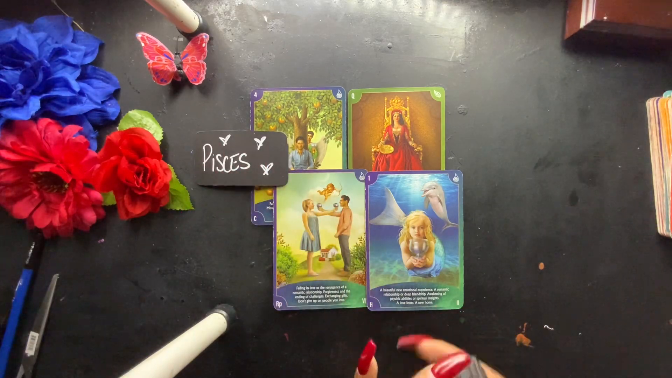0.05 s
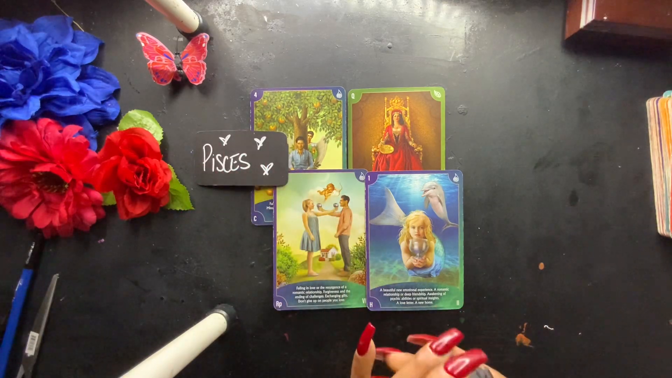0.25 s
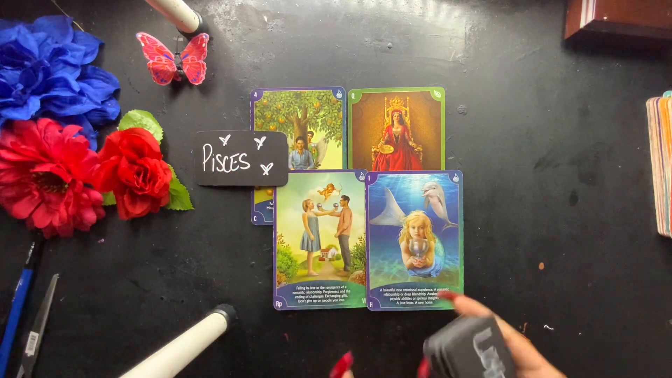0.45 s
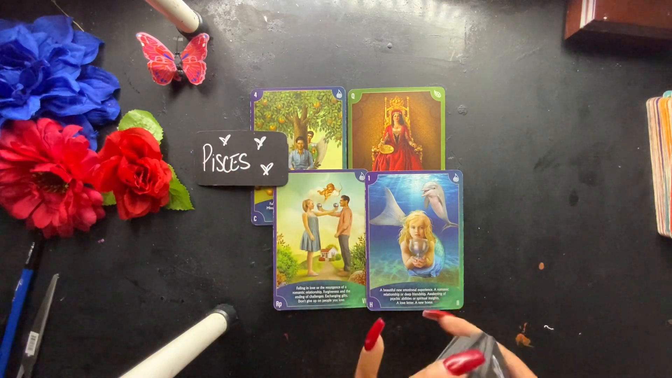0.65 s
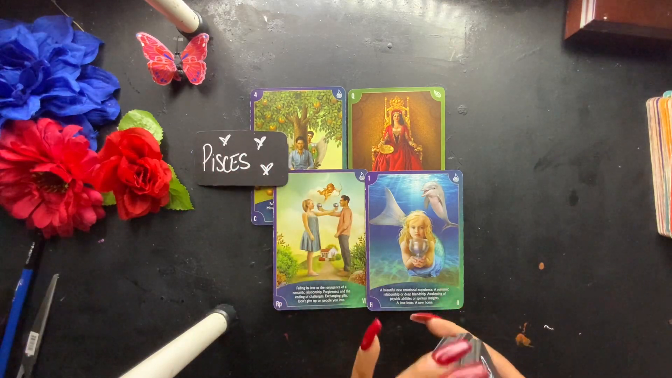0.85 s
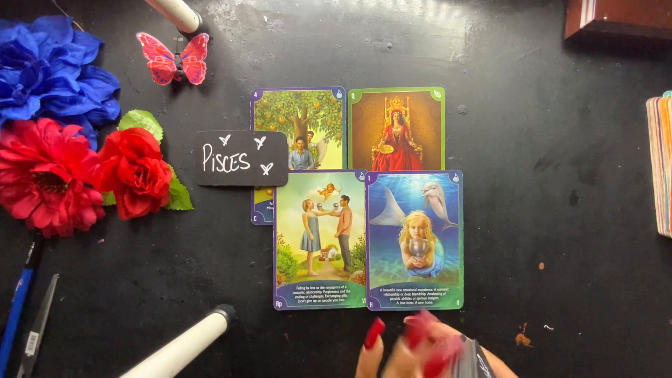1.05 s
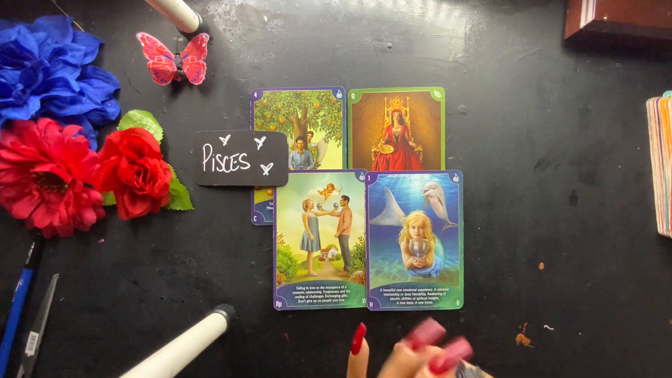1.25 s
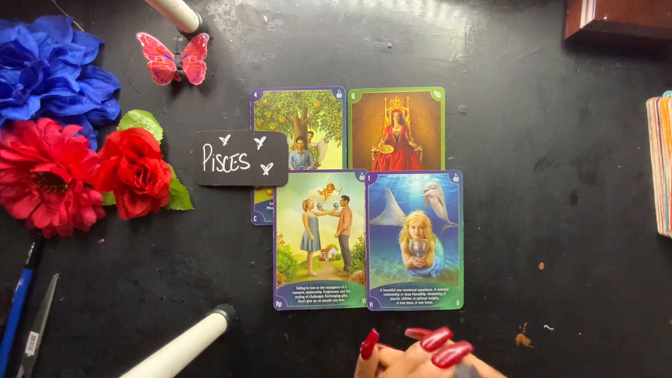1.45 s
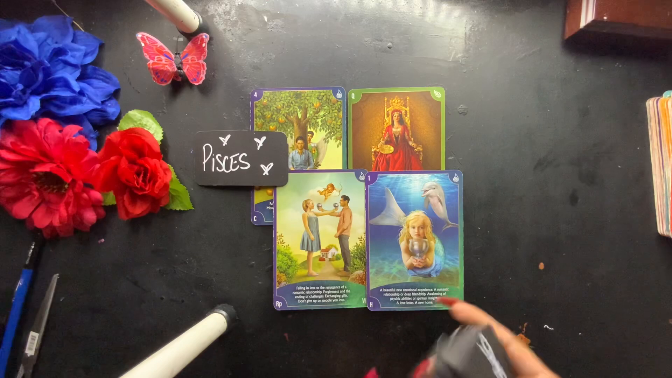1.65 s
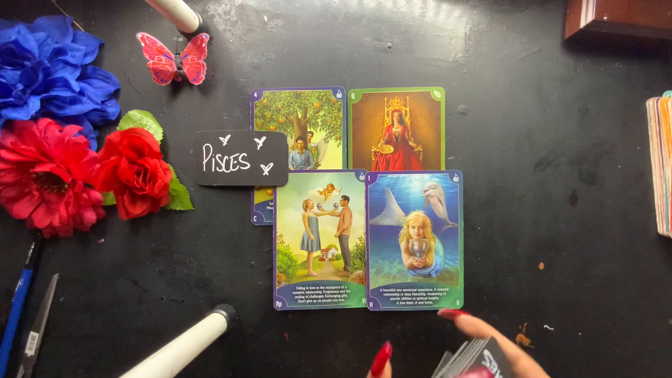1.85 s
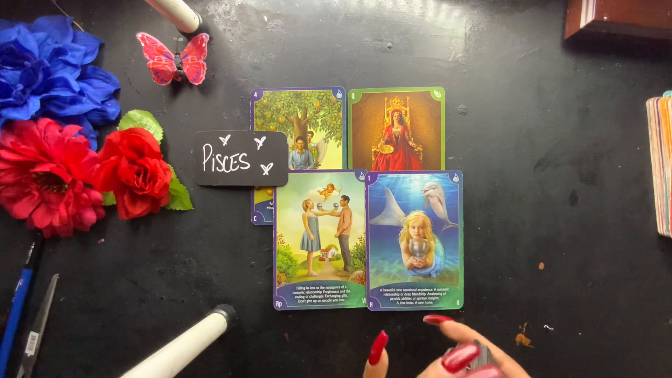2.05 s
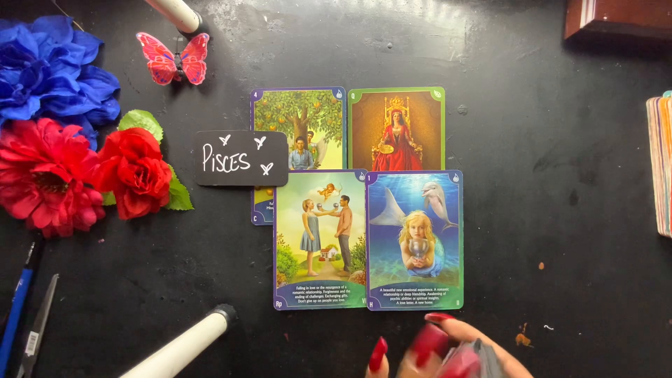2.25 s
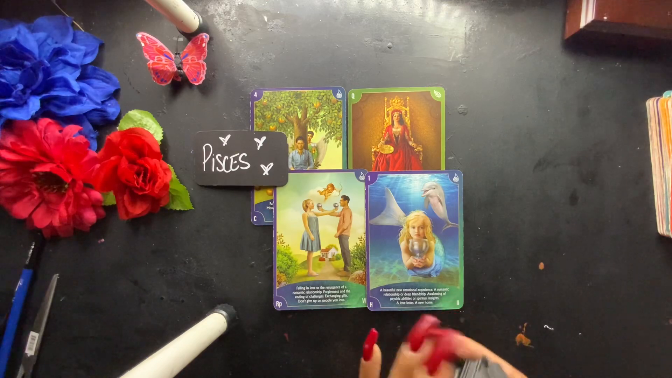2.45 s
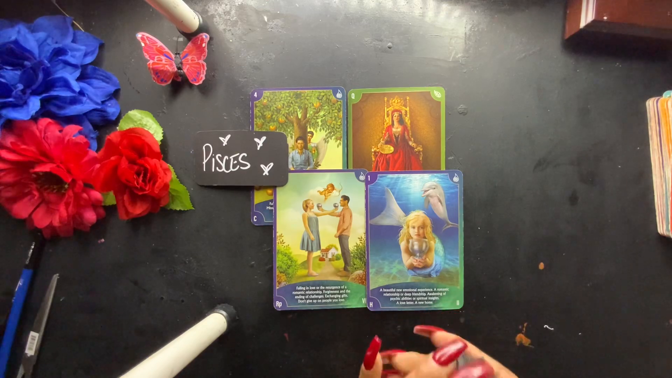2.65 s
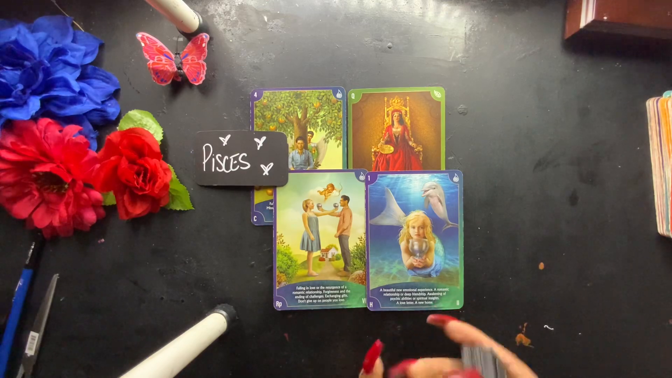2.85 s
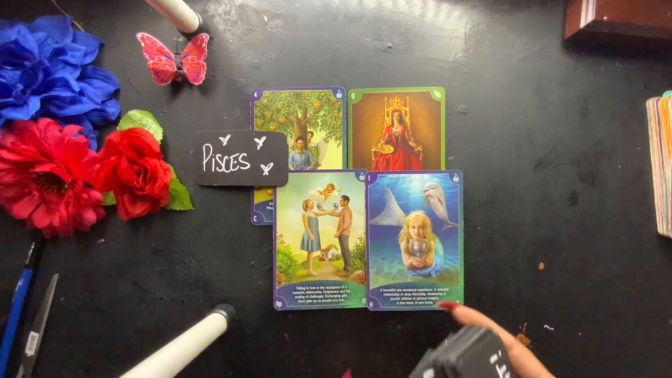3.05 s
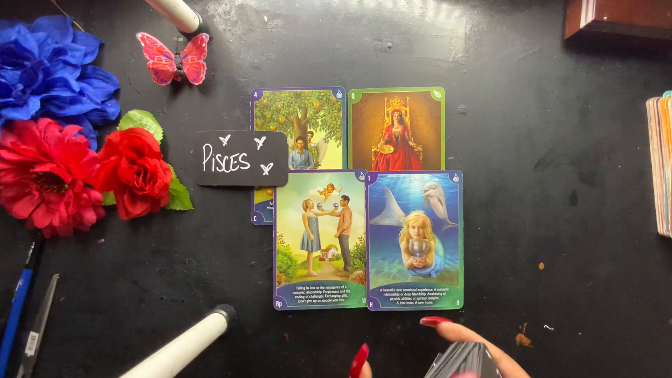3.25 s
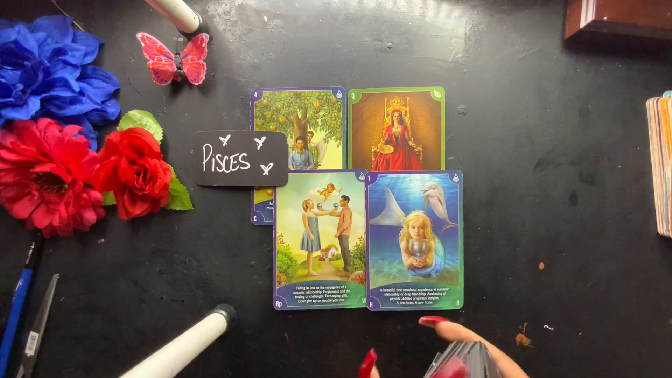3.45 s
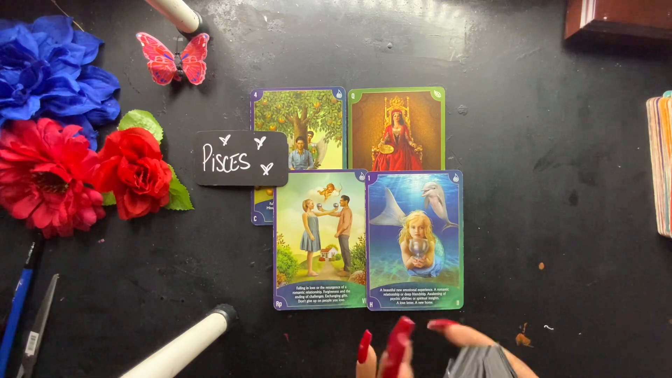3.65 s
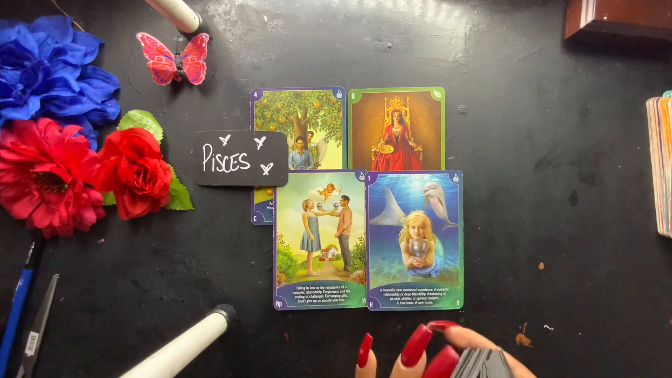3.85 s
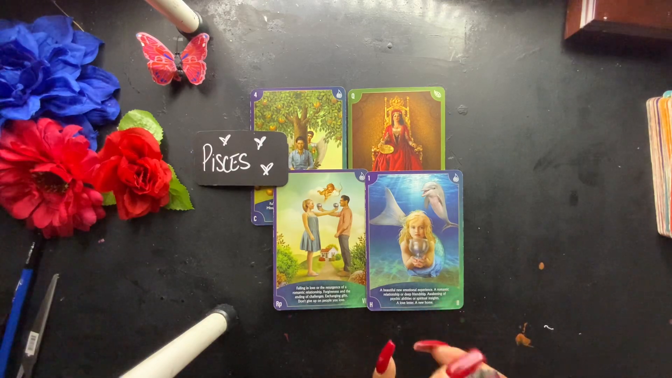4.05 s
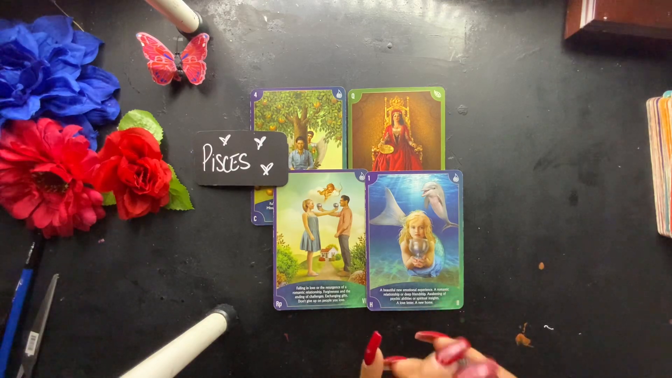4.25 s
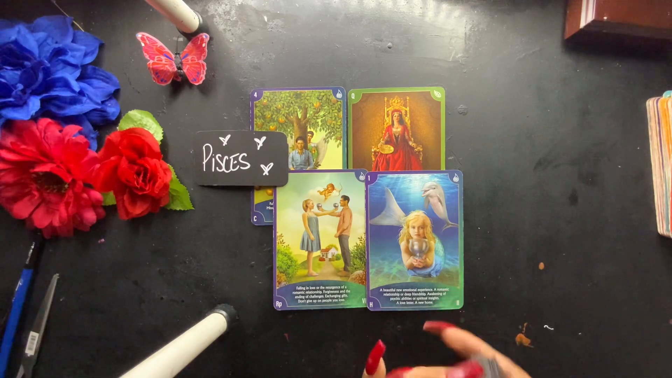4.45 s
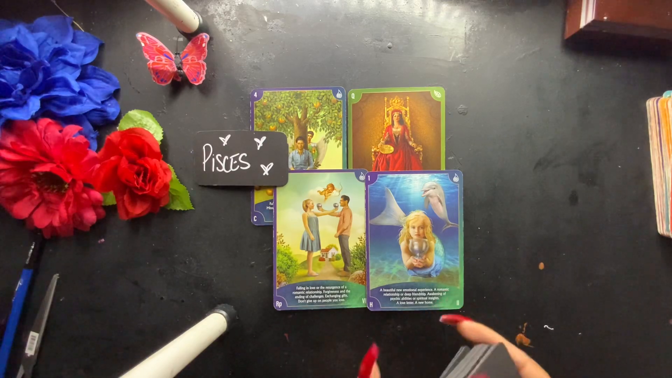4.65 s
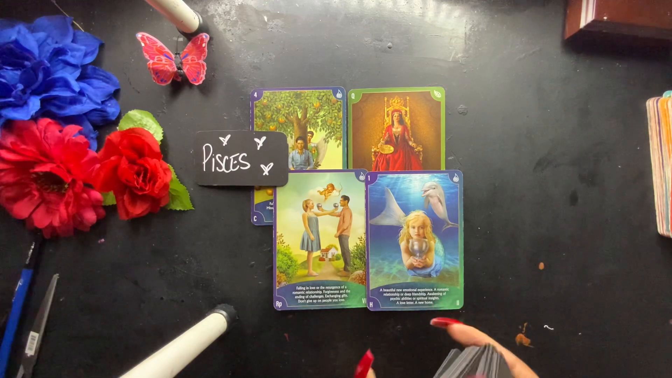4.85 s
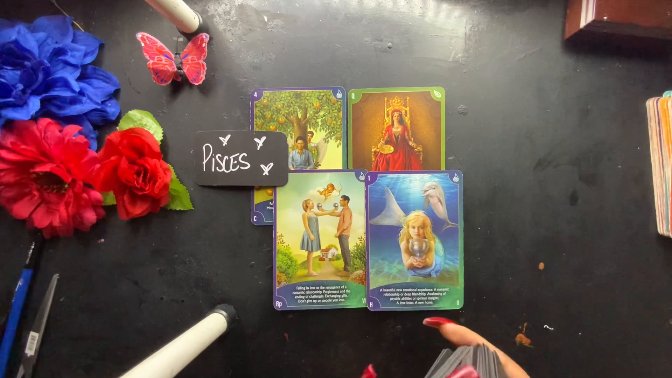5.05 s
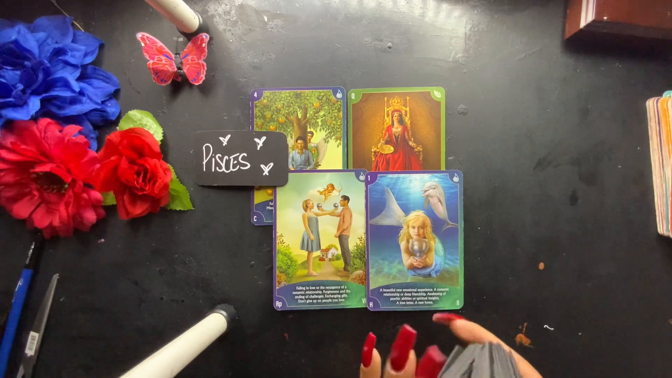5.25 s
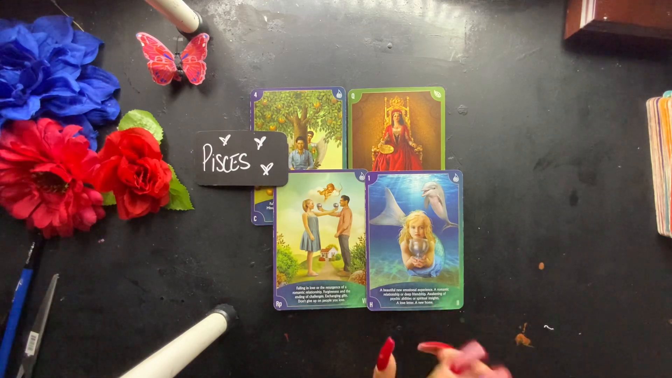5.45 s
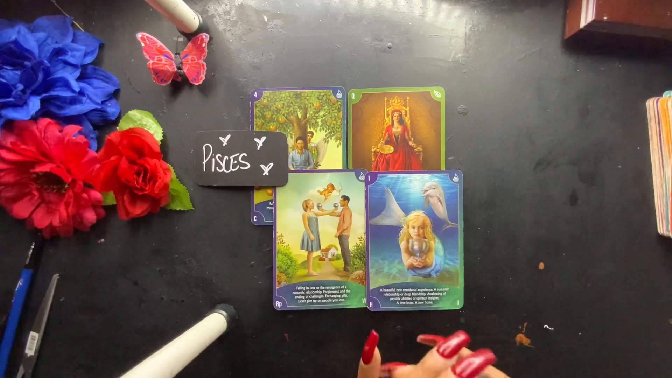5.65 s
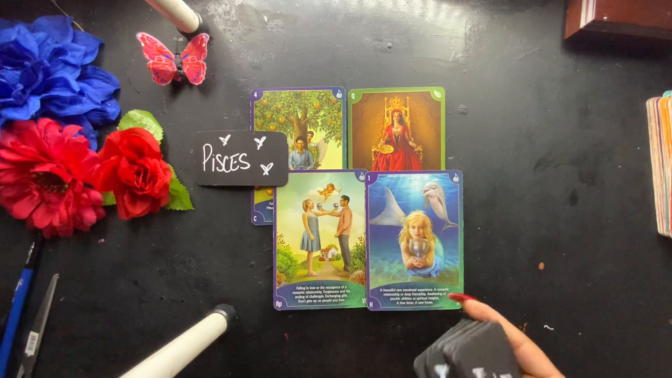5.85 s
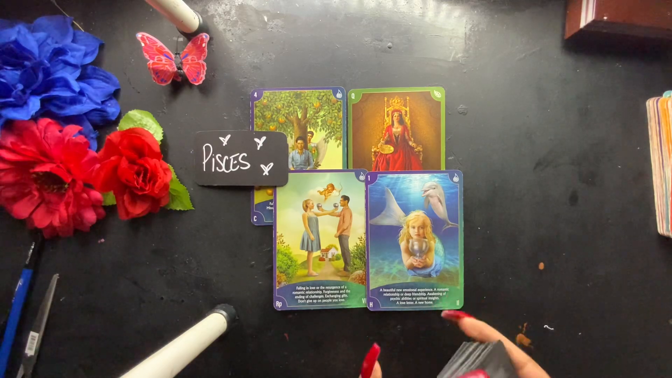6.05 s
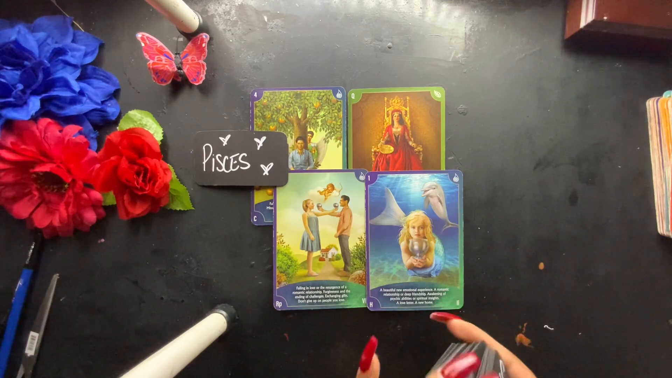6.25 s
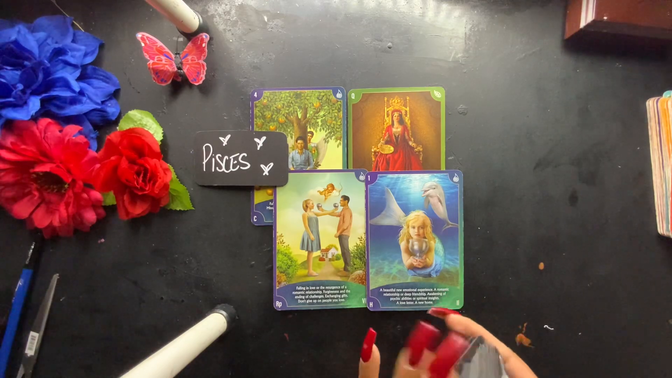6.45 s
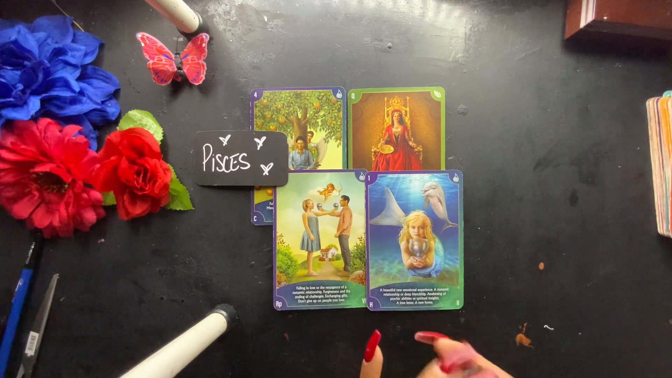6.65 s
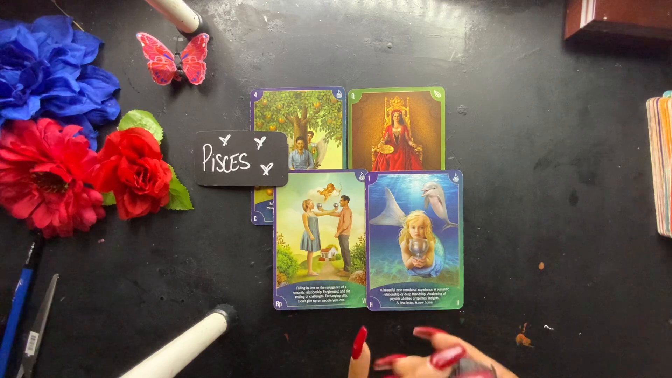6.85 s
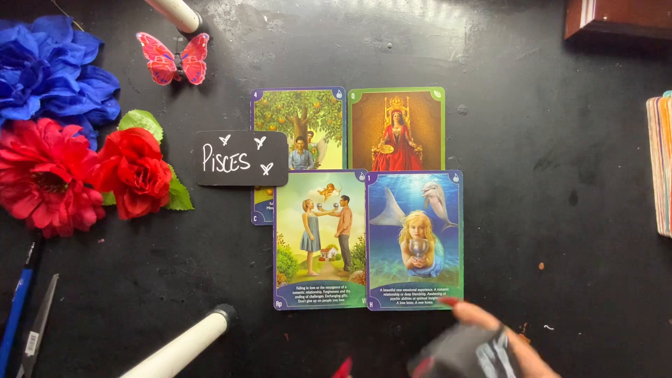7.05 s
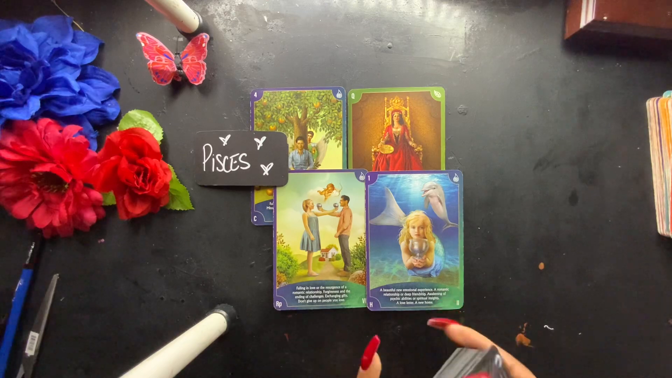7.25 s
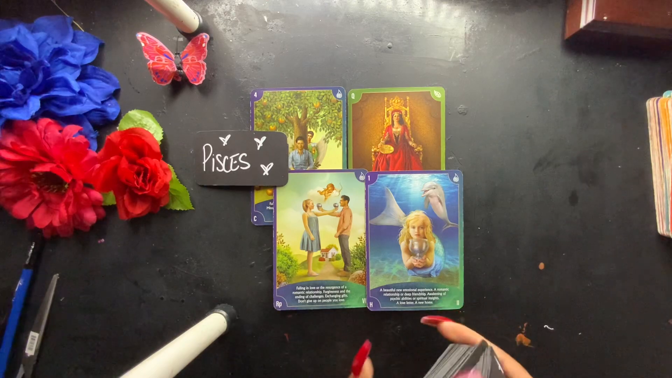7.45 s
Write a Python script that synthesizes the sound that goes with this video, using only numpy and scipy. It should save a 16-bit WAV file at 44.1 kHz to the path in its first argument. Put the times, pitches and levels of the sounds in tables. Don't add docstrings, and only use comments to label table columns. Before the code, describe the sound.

Dry papery rustling and quick card pulls lead to irregular slaps, each hard one a bright crack with a short edge ring and puff of air, followed by a softer tap and skid. Gentle taps fill the gaps. Faint low house hum underneath; small room, short desk and wall reflections, close phone microphone, pops leaning right and the treble arriving there slightly late.

```python
import sys
import numpy as np
from scipy import signal
from scipy.fft import rfft, irfft, next_fast_len
from scipy.io import wavfile
from scipy.ndimage import uniform_filter1d, map_coordinates

SR = 44100
rng = np.random.default_rng(int(sys.argv[2]) if len(sys.argv) > 2 else 0)


def transcribe(u):
    v = np.clip(np.atleast_2d(u).T, -1, 1)
    q = np.round(v * 32767).astype(np.int16)
    wavfile.write(sys.argv[1], SR, q)


def invert_db(level):
    return 10 ** (np.asarray(level, dtype=float) / 20)


N = 331014
SIZE = next_fast_len(N, True)
T = np.arange(N) / SR
HZ = np.maximum(np.fft.rfftfreq(SIZE, 1 / SR), 1)

# (frequency [Hz], level [dB per Hz])
HOUSE_MODES = [(25, -25), (40, -7), (54, 2.5), (72, 0.5), (84, -17.5), (98, 1), (122, -12.5), (145, 1),
               (175, -17), (257, -6), (330, -16.5), (450, -22), (700, -30.5), (1500, -38.5)]
# (start [s], length [s], first level [dB], last level [dB])
SLIDES = [(.0, 0.23, -58.5, -71.5), (.26, .08, -72, -77.5), (.68, 0.028, -59.5, -65),
          (.74, 0.045, -65.5, -58.5), (.88, 0.055, -58.5, -59.5), (.96, 0.055, -68, -60.5),
          (1.245, 0.13, -61.5, -58.5), (1.52, 0.092, -73, -71.5), (1.995, 0.15, -56.5, -51.5),
          (2.18, 0.037, -65.5, -68), (2.4, 0.056, -78.5, -73.5), (2.495, 0.23, -58.5, -63),
          (2.79, 0.052, -64.5, -64), (3.272, 0.091, -51, -54), (3.38, 0.063, -58.5, -55.5),
          (3.47, 0.044, -63.5, -56), (3.55, 0.059, -67, -69.5), (3.78, 0.053, -59.5, -57.5),
          (3.925, 0.1, -57, -57.5), (4.05, 0.083, -60, -60), (4.2, 0.067, -65, -56.5),
          (4.33, 0.074, -71, -97.5), (4.875, 0.12, -54, -55), (5.37, 0.043, -57.5, -57),
          (5.44, 0.12, -56, -65), (5.57, 0.077, -64, -56.5), (6.39, 0.07, -65.5, -58.5),
          (6.62, 0.17, -61.5, -58.5), (6.93, 0.14, -65.5, -51.5), (7.44, 0.057, -55, -51)]
# (end [s], level [dB], rise [s],
# stop [s])
SWISHES = [(0.024, -49.5, 0.0075, 0.0036), (0.211, -50, 0.017, 0.011), (.39, -37, 0.016, .008),
           (1.04, -40, 0.011, 0.016), (1.213, -64.5, 0.0087, 0.0072), (1.432, -51.5, 0.018, 0.018),
           (1.629, -47, .002, .008), (1.655, -35.5, 0.019, 0.0036), (2.283, -44.5, 0.0067, 0.0056),
           (2.771, -58, 0.0039, 0.0069), (2.888, -41, 0.011, 0.023), (2.904, -36.5, 0.013, 0.0067),
           (3.699, -46, 0.023, .006), (4.161, -52, .025, 0.029), (4.503, -36, 0.033, 0.0068),
           (4.84, -58.5, 0.0067, 0.036), (5.112, -47.5, 0.047, 0.022), (5.7, -60, 0.0063, 0.034),
           (5.841, -32, 0.02, 0.0049), (6.215, -55, 0.024, 0.009), (6.467, -47.5, 0.013, 0.0088),
           (6.86, -52, 0.021, 0.028), (7.041, -39.5, 0.014, 0.0064), (7.051, -33.5, 0.0066, 0.0042),
           (7.401, -60, 0.016, 0.029)]
# (start [s], length [s], first level [dB], last level [dB], middle share [dB])
SKIDS = [(0.418, 0.058, -65, -69.5, -6), (0.598, 0.046, -38.5, -48.5, -3), (0.799, 0.053, -49.5, -58.5, -5),
         (1.681, 0.18, -57.5, -87.5, 3), (1.843, .1, -39.5, -58, -6), (2.248, 0.014, -57, -69, -4),
         (2.303, 0.063, -63, -86, -9), (2.945, 0.2, -66, -76, 4.5), (3.089, 0.083, -42.5, -52.5, -5.5),
         (3.199, 0.06, -65.5, -69, -7), (3.704, 0.053, -49, -55.5, -8.5), (4.519, 0.16, -57, -84, 0),
         (3.859, 0.047, -74, -72, 0), (4.677, .13, -37.5, -57, -6), (5.111, 0.039, -47, -56.5, -7),
         (5.872, 0.15, -58.5, -82, 3), (6.022, 0.063, -38.5, -54.5, -3), (6.099, .05, -62, -68, -6.5),
         (6.23, .1, -51.5, -59, -5), (6.472, 0.095, -64.5, -76.5, -11), (7.086, 0.21, -60, -72.5, 3),
         (7.249, 0.13, -39, -65.5, -5.5)]
# (time [s], crack [dB], edge [dB], thud [dB])
SLAPS = [(0.4254, -39.5, -48.5, -47), (0.597, -49, -38, -43.5), (0.7963, -38, -36.5, -46),
         (1.6782, -13, -26.5, -40.5), (1.8476, -57, -38, -45.5), (2.0494, -42, -41, -48),
         (2.2473, -44.5, -55.5, -53), (2.9358, -15, -22.5, -44), (3.0876, -56, -56, -66),
         (3.1032, -38, -35, -46), (3.3, -44, -49.5, -66), (3.5045, -54, -48, -69),
         (3.5138, -53, -44.5, -60), (3.6171, -52, -46.5, -60), (3.821, -43, -52, -73),
         (3.862, -54, -62, -59), (3.9315, -60, -51.5, -71), (4.5257, -18.5, -26.5, -38.5),
         (4.6775, -29, -36.5, -53), (4.8808, -50, -46.5, -50.5), (4.91, -64, -48, -63),
         (5.1046, -53, -40, -44), (5.8631, -18, -28, -47.5), (6.0253, -34, -35, -50),
         (6.2208, -46, -40.5, -58), (6.2719, -54, -58, -66), (7.0754, -17.5, -28, -41),
         (7.2194, -38.5, -39, -65), (7.2511, -49, -37, -45), (7.458, -41, -39, -45.5)]
# (time [s], peak [dB], pitch [Hz], deck knock [dB])
POPS = [(0.4264, -45, 1550, -63), (0.5968, -39.5, 1673, -67), (0.794, -46, 1620, -52),
        (0.842, -51, 1540, -64), (1.6793, -19.5, 1470, -43), (1.8478, -25, 1560, -50.5),
        (2.054, -38.5, 1475, -59), (2.9053, -34, 1540, -55), (2.911, -35.5, 1540, -46),
        (2.9352, -23, 1247, -30), (3.1049, -40.5, 1480, -56), (3.36, -59, 1560, -84),
        (3.517, -46.5, 1870, -51.5), (3.614, -50, 1460, -67), (3.821, -56, 1390, -64),
        (3.869, -59, 1520, -67), (4.4953, -37.5, 1570, -56), (4.5037, -32, 1420, -49),
        (4.527, -19.5, 1380, -44), (4.684, -42, 1590, -46), (4.8777, -42.5, 1485, -51.5),
        (5.1082, -38, 1520, -55), (5.8618, -15, 1440, -38.5), (6.0271, -18.5, 1520, -55),
        (6.22, -34.5, 1530, -63), (6.2723, -48.5, 1390, -59), (7.075, -21, 1485, -38.5),
        (7.218, -46, 1640, -50.5), (7.2463, -35.5, 1450, -52), (7.454, -37.5, 1510, -46)]
# (time [s], peak [dB], pitch [Hz])
RINGS = [(0.596, -42, 2570), (0.7951, -33.5, 2490), (0.796, -36, 5900), (1.6786, -25.5, 2594),
         (1.8477, -41.5, 3030), (2.2461, -52, 3090), (2.935, -22, 4530), (2.942, -25, 3160),
         (3.101, -42, 2910), (3.5157, -44, 2570), (3.8225, -51, 2430), (3.863, -55, 2550),
         (3.9347, -46, 2500), (4.5245, -23, 4080), (4.525, -20.5, 4500), (4.5255, -27.5, 5670),
         (4.6768, -32.5, 2790), (5.8617, -28, 4360), (6.0274, -32.5, 3070), (6.2203, -40, 2940),
         (7.075, -26.5, 4380), (7.218, -44, 3080), (7.2479, -39, 2530)]
# (frequency [Hz], gain [dB])
PAPER_COLOUR = [(4600, -0.5), (6000, 3), (7500, 1), (10000, 2.5), (12000, 3), (14000, -3.5), (16000, 0.5)]
# (frequency [Hz], gain [dB])
FRICTION_LEFT = [(300, -9), (500, -5.5), (800, -9), (1100, -22.5), (1600, -12.5), (2200, -7.5), (2900, -8),
                 (3500, 1.5), (4500, -7)]
# (frequency [Hz], gain [dB])
FRICTION_RIGHT = [(300, -9.5), (500, -7), (800, -12), (1100, -4), (1500, 9.5), (2000, -3.5), (2600, 4),
                  (3200, 5), (3800, -2), (4500, -2.5)]
# (frequency [Hz], gain [dB])
BODY_LEFT = [(250, -7.5), (500, -10), (900, -11), (1500, -5), (2400, -2.5), (3300, -4.5), (4500, 1)]
# (frequency [Hz], gain [dB])
BODY_RIGHT = [(250, -16), (500, -14), (900, -4), (1500, 8), (2600, 1), (3300, 4), (4500, -2)]
# (frequency [Hz], phase [rad])
RIGHT_TURN = [(4000, 4.3), (4950, 4.45), (6400, 3.95), (7900, 3.9), (9400, 3.77), (11000, 3.97),
              (12600, 4.1), (14200, 4.5)]

HOUSE_DB, HISS_DB = -63.5, -87
BASS_HZ, SHARED_HZ, TREBLE_HZ = 330, 3700, 4700
GRIP_DB_PER_S, LET_GO_DB_PER_S = 1206.5, 709
LAND_DB_PER_S, SETTLE_DB_PER_S = 5001, 600
SLIDE_MIDDLE_DB = -7
SWISH_MIDDLE_DB, SWISH_BRIGHTENS_DB_PER_DB = -8.5, 0.23
POP_RISE_S, POP_FADE_S, HARD_POP_FADE_S, RING_FADE_S = 0.00086, 0.0022, 0.0014, 0.0018
HARD_POP_DB = -29
ROOM_T60_S, ROOM_DB, DESK_ECHO_S, DESK_ECHO_DB = 0.23, -10, 0.0115, -14.5
RIGHT_LAG_S = 0.000648


def unit(x):
    return x / np.sqrt(np.mean(x ** 2))


def noise():
    return rng.standard_normal(N)


def shape(x, gain):
    return irfft(rfft(x, SIZE) * gain, SIZE)[..., :N]


def colour(points):
    hz, db = np.transpose(points)
    return invert_db(np.interp(np.log(HZ), np.log(hz), db))


def step(hz, order=8):
    return 1 / np.sqrt(1 + (hz / HZ) ** (2 * order))


def bumps(times_s, db, rise_s, fall_s):
    out = np.zeros(N)
    for s, d, up, down in np.broadcast(times_s, db, rise_s + 1e-4, fall_s + 1e-4):
        near = slice(max(int((s - 8 * up) * SR), 0), int((s + 10 * down) * SR))
        t = T[near] - s
        out[near] += invert_db(d) * np.exp(np.where(t < 0, t / up, -t / down))
    return out


def house():
    modes = colour(HOUSE_MODES) * (1 - step(1700, order=2))
    mid, side = shape(rng.standard_normal((2, N)), modes)
    side = shape(side, step(420, order=2))
    return invert_db(HOUSE_DB) * (mid + np.array([[1], [-1]]) * side) / mid.std()


def grain(patchy_db, size):
    held = np.repeat(rng.standard_normal(N // size + 1), size)[:N]
    slips = unit(uniform_filter1d(held, size))
    return unit(noise() * invert_db(patchy_db * slips))


def scrape(patchy_db, colour_db):
    _, _, cells = signal.stft(grain(patchy_db, size=200), nperseg=256)
    patches = rng.standard_normal((26, 200))
    rows = np.linspace(0, 25, cells.shape[0])
    columns = np.linspace(0, 199, cells.shape[1])
    where = np.meshgrid(rows, columns, indexing="ij")
    wander_db = colour_db * map_coordinates(patches, where, order=1)
    return unit(signal.istft(cells * invert_db(wander_db), nperseg=256)[1][:N])


def strokes(table, grip_db_per_s, let_go_db_per_s):
    out = np.zeros(N)
    for s, length, first_db, last_db in table:
        end = s + length
        near = slice(max(int((s - 0.1) * SR), 0), int((end + 0.15) * SR))
        t = T[near]
        db = np.interp(t, [s, end], [first_db, last_db])
        db = db - grip_db_per_s * np.maximum(s - t, 0)
        out[near] += invert_db(db - let_go_db_per_s * np.maximum(t - end, 0))
    return out


def friction():
    slide = strokes(SLIDES, GRIP_DB_PER_S, LET_GO_DB_PER_S)
    end, db, rise, stop = np.transpose(SWISHES)
    swish = bumps(end, db, rise, stop)
    share_db = SWISH_MIDDLE_DB - SWISH_BRIGHTENS_DB_PER_DB * (db + 54.5)
    dull_swish = bumps(end, db + share_db, rise, stop)
    skid = strokes([row[:4] for row in SKIDS], LAND_DB_PER_S, SETTLE_DB_PER_S)
    dull_rows = [(s, n, a + share, b + share) for s, n, a, b, share in SKIDS]
    dull_skid = strokes(dull_rows, LAND_DB_PER_S, SETTLE_DB_PER_S)
    return slide + skid + swish, invert_db(SLIDE_MIDDLE_DB) * slide + dull_skid + dull_swish


def walls(x, t60_s=ROOM_T60_S):
    t = T[:int(0.5 * SR)]
    tail = rng.standard_normal(len(t)) * np.exp(-np.log(1000) * t / t60_s) * (t > 0.006)
    tail = invert_db(ROOM_DB) * tail / np.sqrt(np.sum(tail ** 2))
    tail[int(DESK_ECHO_S * SR)] += invert_db(DESK_ECHO_DB)
    return signal.fftconvolve(x, tail)[:N]


def paper_treble(high, rub):
    s, crack_db, _, _ = np.transpose(SLAPS)
    crack = bumps(s, crack_db - 5.5, 0.00051, 0.0029) * grain(0.64, size=20)
    hiss = invert_db(HISS_DB) * noise()
    paper = colour(PAPER_COLOUR) * step(TREBLE_HZ, order=30)
    treble = shape(high * rub + crack + hiss, 0.96 * paper)
    return treble + invert_db(-12) * walls(treble, t60_s=0.2)


def edge():
    s, _, edge_db, _ = np.transpose(SLAPS)
    return bumps(s, edge_db + 5, 0.00017, 0.0052)


def thud():
    s, _, _, thud_db = np.transpose(SLAPS)
    boom = bumps(s + 0.0045, thud_db + 15.5, 0.0011, 0.027) * noise()
    return shape(boom, step(220, order=2) * (1 - step(420, order=3)))


def tones(table, soft_fade_s, hard_fade_s):
    out = np.zeros(N)
    t = np.arange(-400, 1200) / SR
    for s, db, hz, *_ in table:
        fade = hard_fade_s if db > HARD_POP_DB else soft_fade_s
        bell = np.exp(-0.5 * (t / np.where(t < 0, POP_RISE_S, fade + 1e-4)) ** 2)
        start = int((s + 0.001962) * SR)
        out[start - 400:start + 1200] += invert_db(db) * bell * np.sin(2 * np.pi * hz * t)
    return out


def knock():
    s, _, _, knock_db = np.transpose(POPS)
    return bumps(s, knock_db + 20.87, 0.00063, 0.0077)


def right_delay():
    turn_rad = np.interp(HZ, *np.transpose(RIGHT_TURN))
    return np.exp(1j * (turn_rad - 2 * np.pi * HZ * RIGHT_LAG_S))


def scene():
    high, middle = friction()
    rub = scrape(2.2, 2.6)
    treble = paper_treble(high, rub)
    delay = right_delay()
    edges, knocks = edge(), knock()
    pop = tones(POPS, POP_FADE_S, HARD_POP_FADE_S)
    ringing = tones(RINGS, RING_FADE_S, RING_FADE_S)
    band = step(BASS_HZ, order=2) * (1 - step(TREBLE_HZ, order=30))
    knock_band = step(930, order=2) * (1 - step(1300, order=3))
    sides = []
    # (friction colour, body colour, pop [dB], pop into room [dB], knock [dB], lag)
    for points, body, pop_db, wet_db, knock_db, lag in (
            (FRICTION_LEFT, BODY_LEFT, -26, -10, -5, 1),
            (FRICTION_RIGHT, BODY_RIGHT, 5, -2.5, 3, delay)):
        fibres = shape(scrape(2.7, 3.3), 1 - step(SHARED_HZ)) + shape(rub, lag * step(SHARED_HZ))
        cards = shape(2.6 * (middle + invert_db(HISS_DB - 6.5)) * fibres, colour(points) * band)
        cards = cards + shape(edges * noise(), colour(body) * band)
        cards = cards + invert_db(knock_db) * shape(knocks * noise(), knock_band)
        ring = invert_db(knock_db - 6) * ringing
        wash = walls(cards + invert_db(-6) * ring + invert_db(wet_db) * pop)
        wash = shape(wash, 1 - 0.28 * step(3100, order=4))
        sides.append(cards + ring + wash + invert_db(pop_db) * pop)
    return np.array(sides) + np.array([treble, shape(treble, delay)]) + thud() + house()


def roll_off(x):
    return signal.sosfilt(signal.butter(12, 16940, fs=SR, output="sos"), x)


def record(dry):
    mix = shape(dry, 1 - (1 - invert_db(-35.5)) * step(15750, order=90))
    return roll_off(mix)


dry = scene()
out = record(dry)
transcribe(out)
```